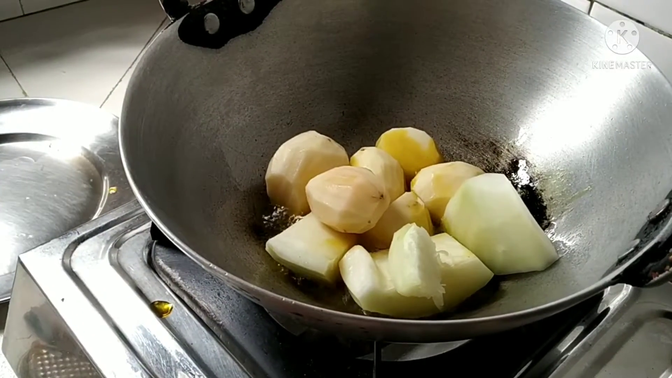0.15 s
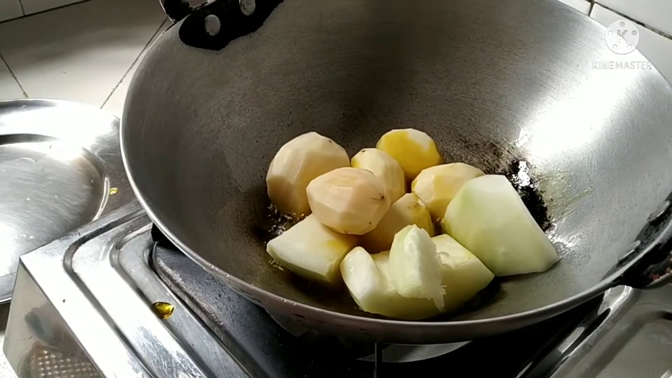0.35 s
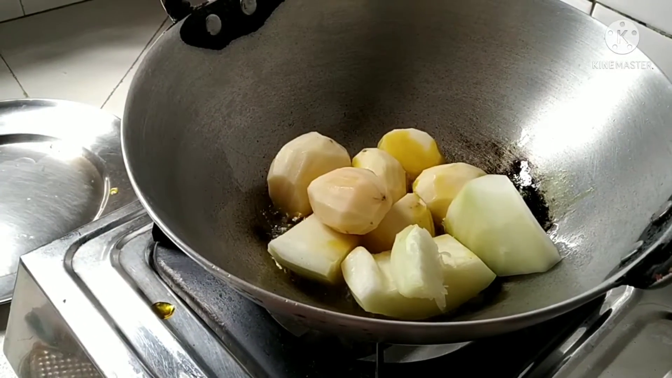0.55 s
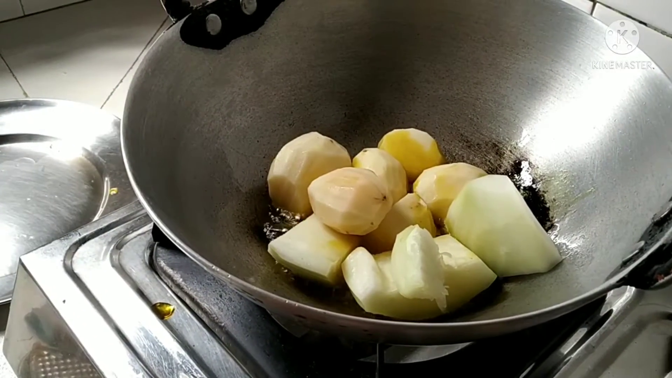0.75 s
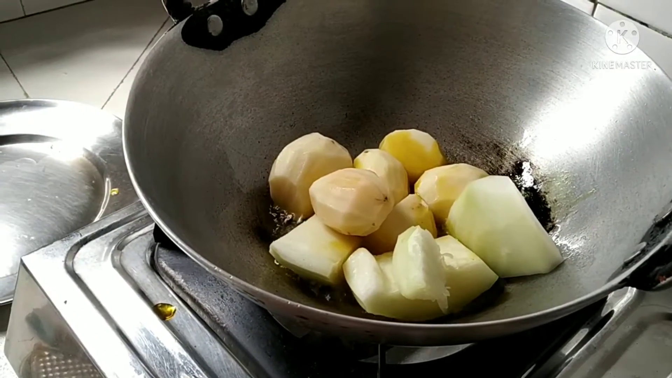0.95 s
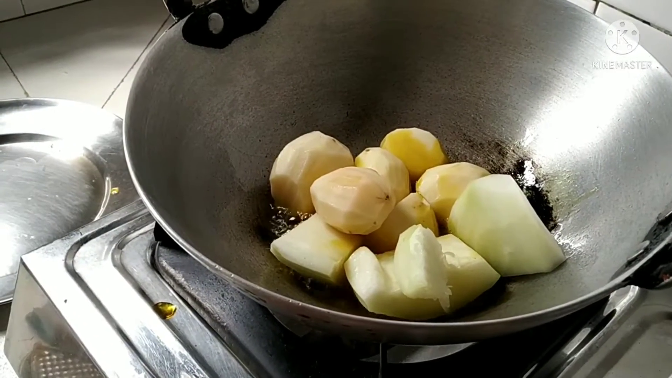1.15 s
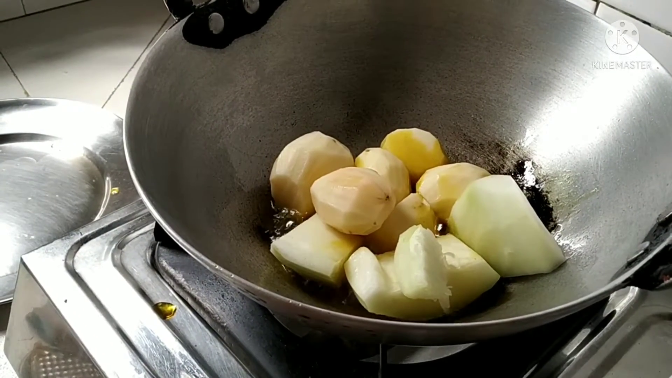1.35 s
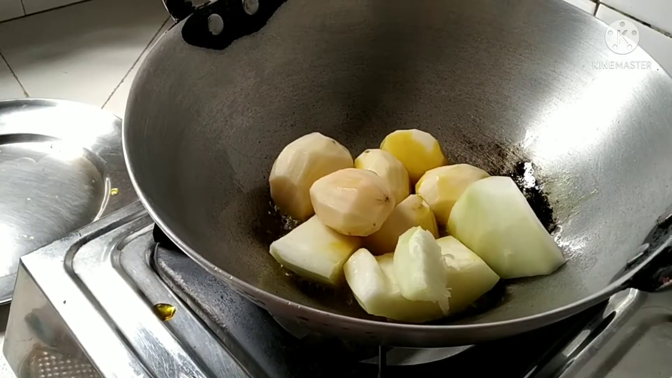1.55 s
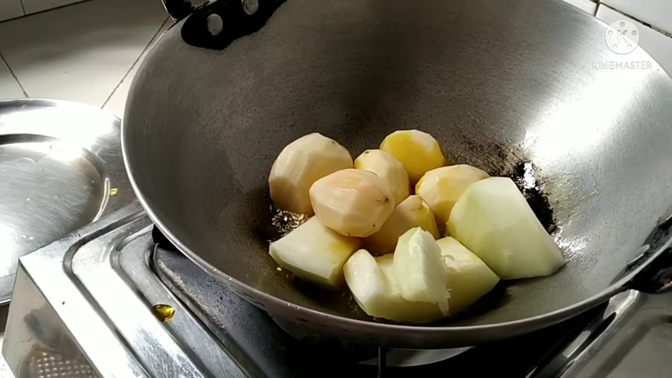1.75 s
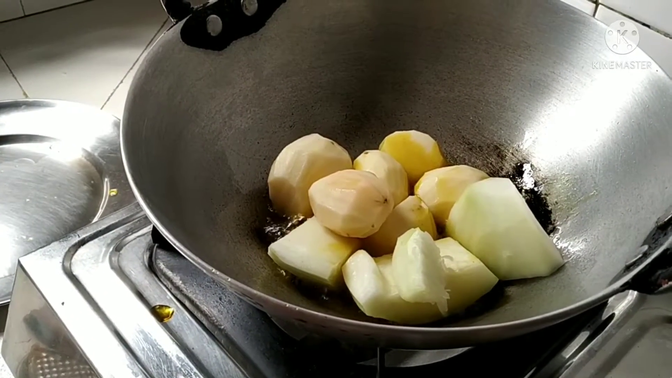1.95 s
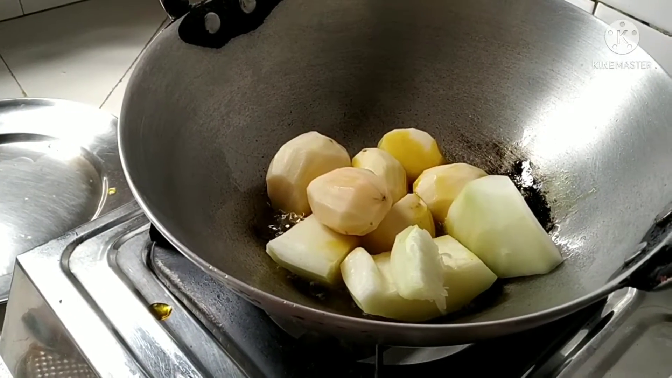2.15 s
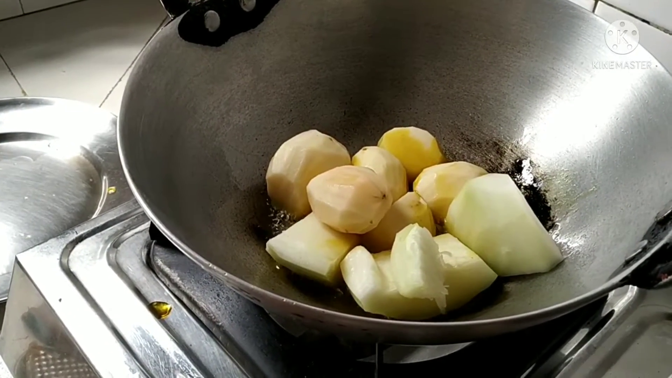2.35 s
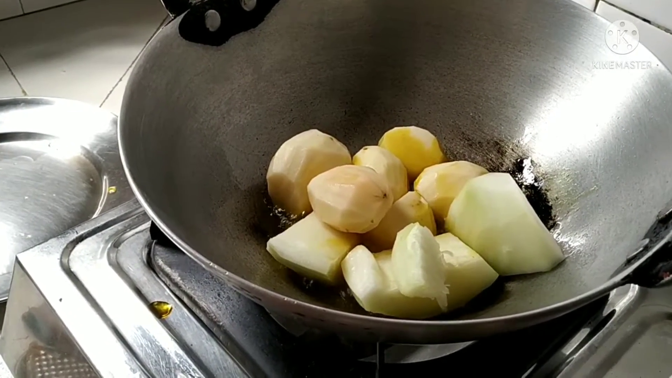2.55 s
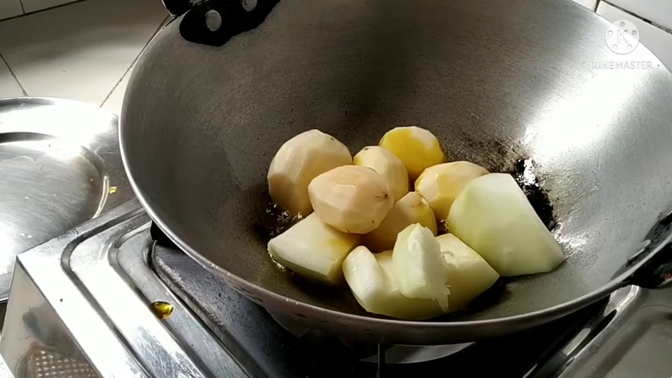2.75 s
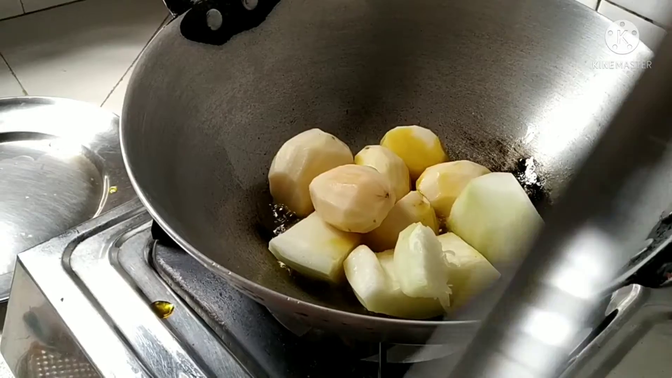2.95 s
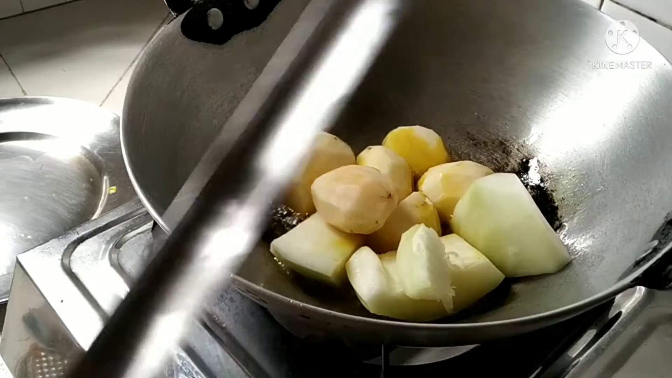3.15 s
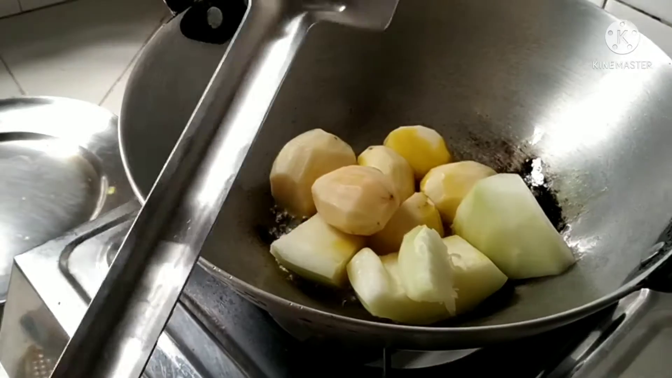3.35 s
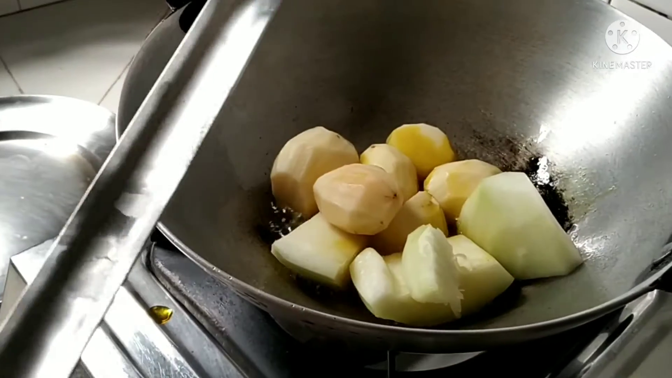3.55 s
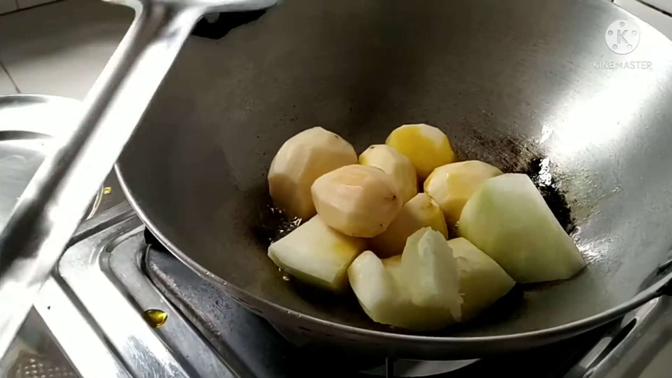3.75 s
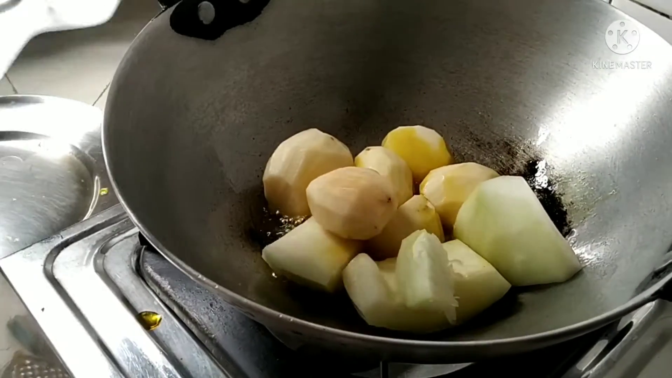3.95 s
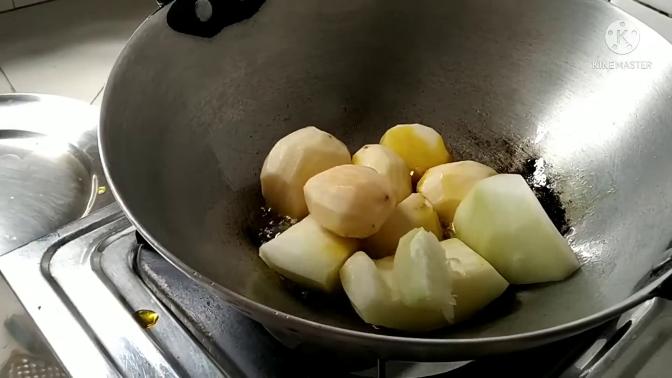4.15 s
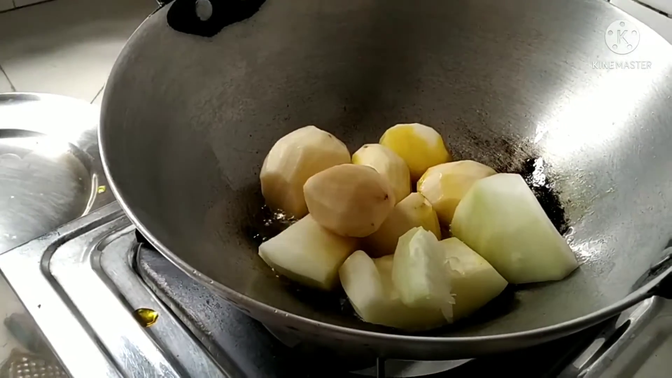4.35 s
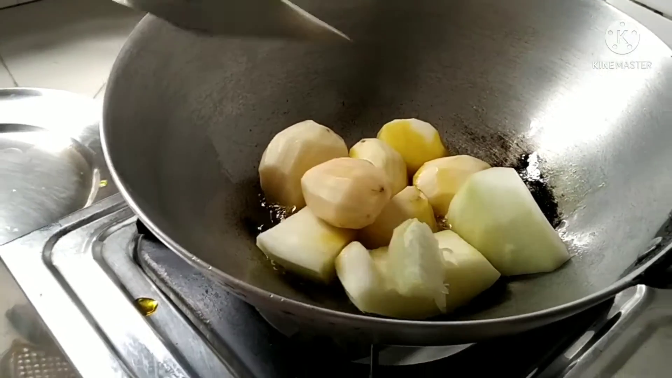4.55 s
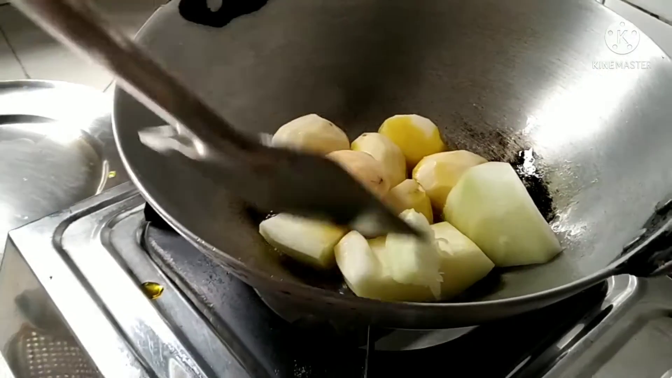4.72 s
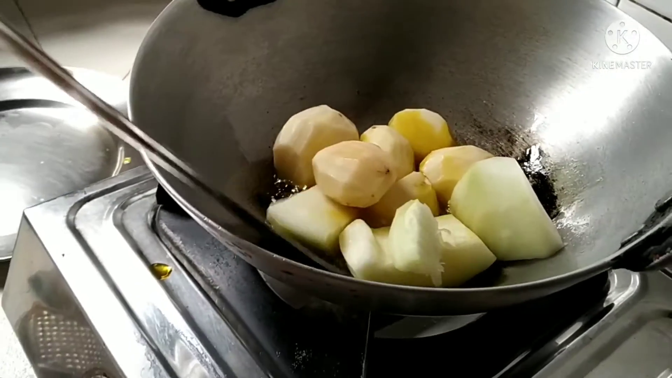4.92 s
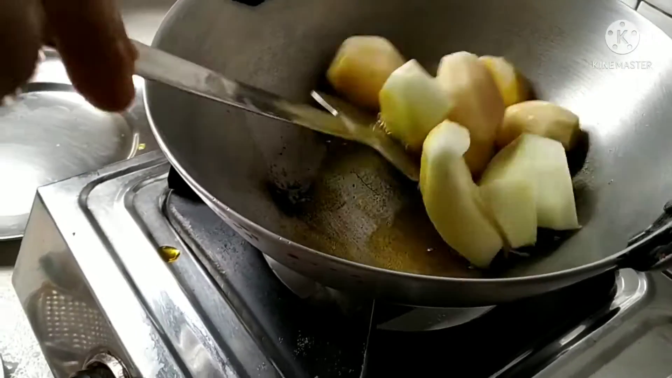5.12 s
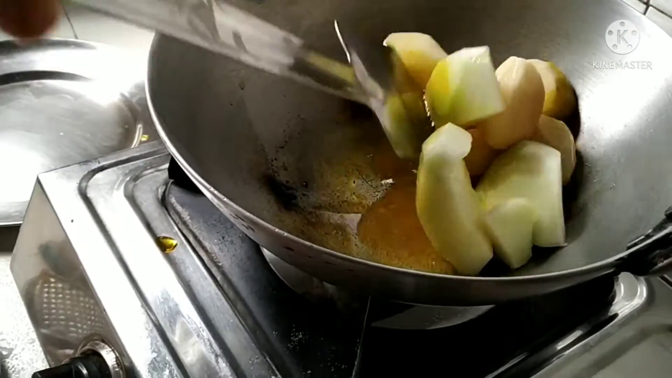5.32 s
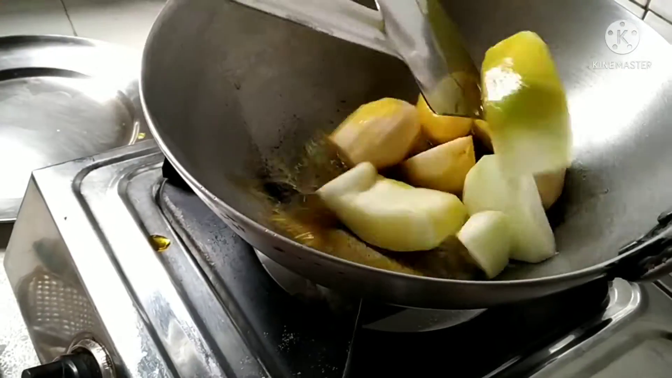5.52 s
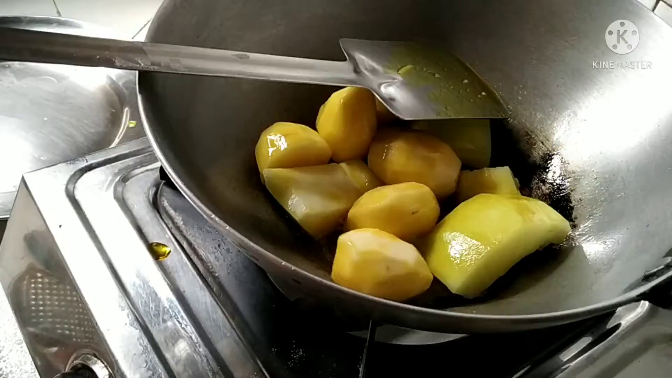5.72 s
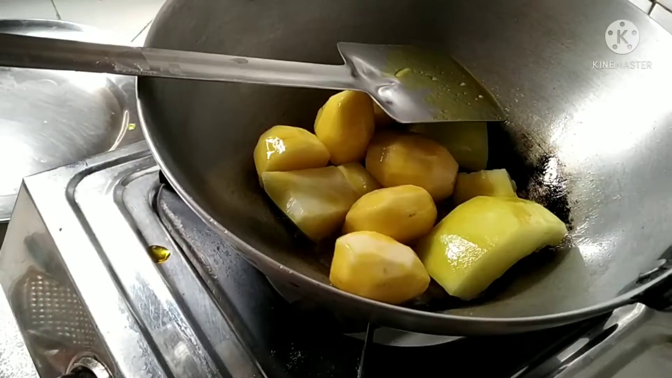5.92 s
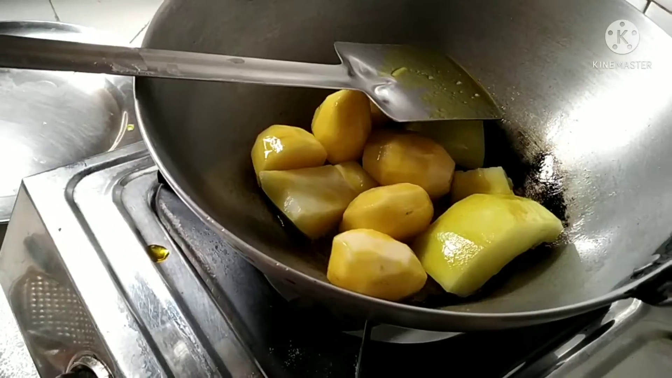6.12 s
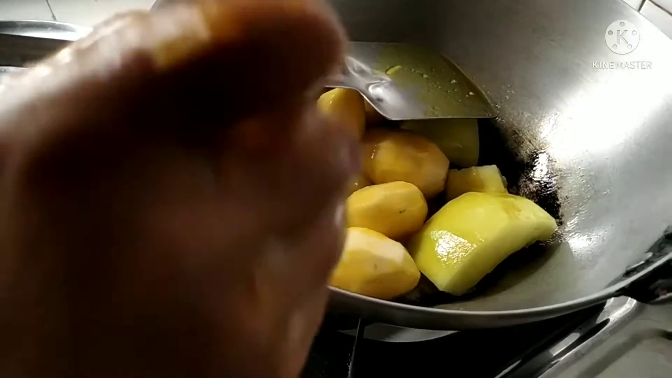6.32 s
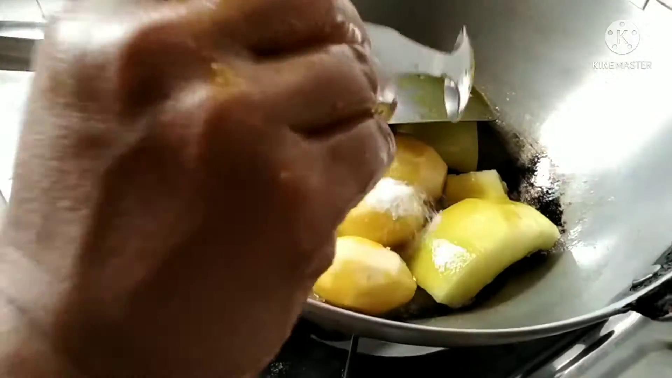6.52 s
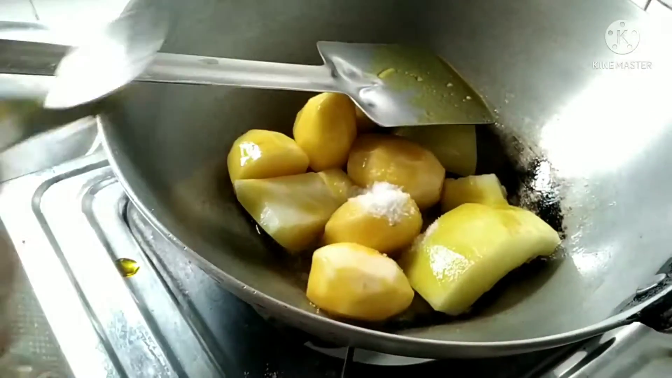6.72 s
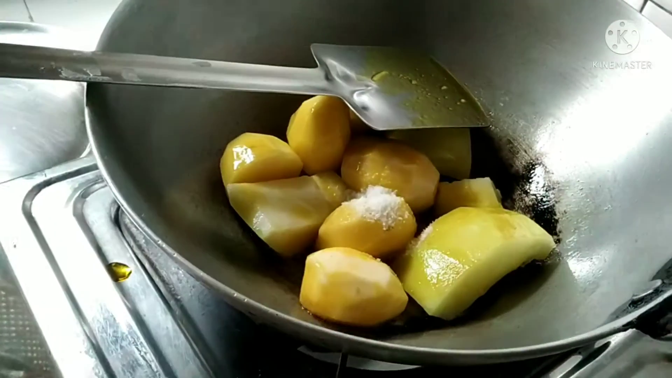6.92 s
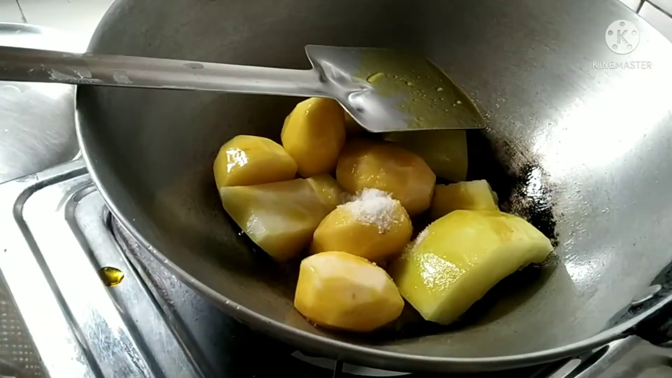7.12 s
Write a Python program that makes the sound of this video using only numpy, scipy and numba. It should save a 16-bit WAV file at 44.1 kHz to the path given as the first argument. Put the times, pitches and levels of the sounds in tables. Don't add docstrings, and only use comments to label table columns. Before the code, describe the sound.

Vegetables sizzle in oil in a metal pan, crackling finely. Light steel clinks come early, then a loud flat slap, rocking rattle and bright ringing clang; later a scrape-like run of knocks as the pieces are turned and the frying flares. The sound cuts out briefly and returns as even frying with small ticks. Stereo phone pickup, small hard-walled kitchen.

```python
import sys
import numpy as np
from scipy import signal
from scipy.fft import rfft, irfft, next_fast_len
from scipy.io import wavfile
from scipy.ndimage import uniform_filter1d, minimum_filter1d
from numba import njit

SR = 44100
rng = np.random.default_rng(int(sys.argv[2]) if len(sys.argv) > 2 else 0)


def dump_mix(stems):
    frames = np.atleast_2d(stems).T
    limited = np.clip(frames, -1, 1)
    pcm = np.round(limited * 32767).astype(np.int16)
    wavfile.write(sys.argv[1], SR, pcm)


def voltage_ratio(level):
    return 10 ** (np.asarray(level, float) / 20)


N = 321048
TIME, SIZE = np.arange(N) / SR, next_fast_len(N)
HZ = np.maximum(np.arange(SIZE // 2 + 1) * SR / SIZE, 1)
SECOND_SHOT_S = 5.8


def unit(x):
    return x / np.sqrt(np.mean(x ** 2))


def response(points):
    hz, db = np.transpose(points)
    return voltage_ratio(np.interp(np.log(HZ), np.log(hz), db))


def colour(x, points):
    return unit(irfft(rfft(x, SIZE) * response(points), SIZE)[:, :N])


def band(x, hz, width_hz):
    return signal.lfilter(*signal.iirpeak(hz, hz / width_hz, SR), x)


def walk(rate):
    k = int(SR / rate)
    held = np.repeat(rng.standard_normal(N // k + 1), k)
    return 1.53 * uniform_filter1d(uniform_filter1d(held, k), k)[:N]


def by_shot(first, second):
    return np.where(TIME < SECOND_SHOT_S, first, second)


def curve(shots):
    return by_shot(*(np.interp(TIME, *np.transpose(shot)) for shot in shots))


def bursts(rows, rise_s):
    out, t = np.zeros((2, N + SR)), TIME[:SR // 4]
    for s, db, hz, width_hz, t60 in rows:
        i = int(s * SR)
        noise = rng.standard_normal((2, len(t)))
        shake = unit(band(band(noise, hz, 1.41 * width_hz), hz, 1.41 * width_hz))
        decay = voltage_ratio(db - 5.5 - 60 * t / t60)
        out[:, i:i + len(t)] += decay * np.minimum(t / rise_s, 1) * shake
    return out[:, :N]


# hz, width_hz, level_db
ROOM_MODES = [(40, 5, -14.5), (68.1, 4.7, -3.5), (99.3, 6.1, -4.5), (138.6, 5.9, -9.5), (204, 5.1, -11),
              (90, 120, -10)]
# time_s, level_db
FLAME = [
    [(0, -47.5), (2.5, -47.5), (3.1, -50), (4.2, -48), (4.6, -46.5), (5.6, -45)],
    [(5.9, -53), (6.3, -47.5), (7.28, -48)],
]


def flame():
    roar = rng.standard_normal((2, N))
    rumble = unit(sum(voltage_ratio(db) / np.sqrt(width) * band(roar, hz, width) for hz, width, db in ROOM_MODES))
    low_cut = signal.butter(N=4, Wn=35, btype="high", fs=SR, output="sos")
    return signal.sosfilt(low_cut, rumble) * voltage_ratio(curve(FLAME) + 3.5)


def kitchen(x):
    t60_s, echo_db = 0.35, -7.5
    t = TIME[:SR // 2]
    echo = rng.standard_normal((2, len(t))) * voltage_ratio(-60 * t / t60_s) * (t > .004)
    echo /= np.sqrt(np.sum(echo ** 2, axis=1, keepdims=True))
    return x + voltage_ratio(echo_db) * signal.fftconvolve(x, echo, axes=1)[:, :N]


# start_s, peak_db, centre_hz
THUDS = [(.406, -28, 460), (.73, -31, 484), (.804, -32, 277), (.899, -31.5, 466), (.945, -23.5, 320),
         (2.456, -15, 1790), (2.458, -23, 330), (2.705, -24.5, 600), (2.707, -24.5, 285), (2.721, -31, 100),
         (2.735, -22, 899), (2.933, -25, 1190), (2.96, -31, 921), (4.958, -18, 1100), (4.96, -27, 300),
         (4.99, -24, 500), (5.05, -30.5, 484), (5.151, -38, 339), (5.21, -28, 900), (5.33, -32.5, 256)]
# start_s, peak_db, centre_hz
SLAPS = [
    (2.456, -1.5, 863),
    (5.497, -23, 1500),
]
# start_s, peak_db
ROCKS = [(2.488, -23), (2.515, -22), (2.543, -25), (2.571, -21), (2.586, -23)]
# start_s, peak_db, centre_hz
CATCHES = [(5.095, -23, 2190), (5.135, -27, 2010), (5.19, -23.5, 476), (5.2, -21, 2260), (5.335, -25, 1010),
           (5.678, -25.5, 1034), (7.248, -26.5, 910)]


def knocks():
    rows = [(s, db, hz, 0.85 * hz, 0.21) for s, db, hz in THUDS]
    rows += [(s, db, hz, 0.85 * hz, 0.035) for s, db, hz in SLAPS]
    rows += [(s, db, 388, 160, 0.16) for s, db in ROCKS]
    rows += [(s, db, hz, 0.2 * hz, 0.092) for s, db, hz in CATCHES]
    return bursts(rows, 0.0035)


# start_s, blade_db, blade_hz, wall_db, t60_s
CLINKS = [(.385, -22, 8000, -41, 0.25), (.408, -9, 8750, -25, 0.12), (0.897, -10, 8900, -27, 0.049),
          (.915, -15.5, 10500, -27.5, 0.272), (.947, -19, 9000, -23.5, 0.12),
          (2.455, -14, 6600, -16, 0.066), (2.703, -4.5, 7500, -13, 0.12), (2.729, -6, 6500, -15.5, 0.19),
          (2.931, -14, 8700, -15.5, 0.094), (2.948, -16.5, 8500, -21, 0.17), (2.965, -22, 8000, -20, 0.17),
          (4.953, -9, 8630, -14.5, 0.18), (4.955, -3.5, 8500, -19, 0.2), (4.969, -7.5, 7560, -24, 0.29),
          (5.051, -15, 8450, -25.5, 0.23), (5.497, -9, 7100, -13.5, 0.014), (5.507, -12, 9000, -31, 0.14),
          (5.527, -16, 8500, -33, 0.22)]


def clinks():
    blade = [(s, db, hz, 4500, t60) for s, db, hz, _, t60 in CLINKS]
    wall = [(s, db, 2800, 2000, t60) for s, _, _, db, t60 in CLINKS]
    return bursts(blade + wall, 0.00099)


# start_s, peak_db, pitch_hz, t60_s
TINKS = [(.408, -20, 5470, .17), (.41, -14, 9860, 0.16), (.898, -17, 7470, 0.073), (.899, -20, 11300, .15),
         (.918, -23, 10570, .35), (.92, -25, 11750, .25), (0.944, -31, 2820, 0.12),
         (2.456, -9.5, 2560, 0.065), (2.52, -26, 1030, 0.26), (4.954, -20, 7120, .25),
         (4.954, -9.5, 8930, 0.23), (4.956, -19.5, 2300, .24), (4.956, -14.5, 2870, .21),
         (5.4975, -13, 6500, .018)]


def tinks():
    return bursts([(s, db, hz, 23 / t60, t60) for s, db, hz, t60 in TINKS], .002)


# start_s, peak_db,
# pitch_hz
TICKS = [(.409, -16, 8500), (.898, -14, 8500), (2.9318, -10, 8000), (2.934, -17, 2800), (2.9465, -16, 8300),
         (5.4978, -9, 6550), (5.5085, -11, 9000), (6.753, -16, 8500), (6.939, -17, 8000)]


def ticks():
    t60_s = 0.011
    out, t = np.zeros((2, N)), TIME[:SR // 50]
    port_turn = np.array([[0], [.25]])
    for s, db, hz in TICKS:
        i = int(s * SR)
        out[:, i:i + len(t)] += voltage_ratio(db - 60 * t / t60_s) * np.sin(2 * np.pi * (hz * t + port_turn))
    return out


SPATULA_HZ = [345, 388, 568, 619, 894, 2256, 2750, 3058, 4151, 5098, 5582, 6282, 7795, 8975, 9561]
# level_db, t60_s
SPATULA = [(-33, 0.85), (-39.5, 0.85), (-29.5, 0.35), (-36.5, 0.81), (-31, 0.28), (-32, 0.33),
           (-18.5, 0.12), (-19, 0.13), (-29, 0.33), (-22, 0.22), (-24, 0.22), (-38, 0.22), (-29, .25),
           (-22, 0.17), (-20, 0.27)]
# start_s, level_db
RINGS = [
    (2.703, 4.5),
    (2.728, -8.5),
    (2.931, -19),
]
# start_s, pitch_hz, level_db, t60_s, stop_s
LONG_RING = [
    (2.705, 1298, -39.5, 6.5, 4.15),
    (2.703, 4485, -31.5, 30, 3.07),
    (2.703, 7104, -20, .8, 2.96),
    (2.92, 3155, -37, 2.2, 3.4),
]


def spatula():
    out, t = np.zeros((2, N)), TIME[:SR]
    hz, (mode_db, t60) = np.array(SPATULA_HZ)[:, None], np.transpose(SPATULA)[:, :, None]
    for s, db in RINGS:
        i, turn = int(s * SR), rng.random((2, len(SPATULA), 1))
        modes = voltage_ratio(db + mode_db - 60 * t / t60) * np.sin(2 * np.pi * (hz * t + turn))
        out[:, i:i + SR] += modes.sum(axis=1)
    for s, tone_hz, db, tone_t60, stop in LONG_RING:
        held = np.clip((TIME - s) / .008, 0, 1) * np.clip((stop - TIME) / .06, 0, 1)
        phase = 2 * np.pi * tone_hz * TIME
        out += held * voltage_ratio(db - 60 * (TIME - s) / tone_t60) * np.array([np.sin(phase), np.cos(phase) / 2])
    return out


# start_s, peak_db, centre_hz
SPITS = [(1.817, -21, 4350), (1.8567, -16, 5600), (2.532, -13.5, 4470), (2.684, -30, 2750),
         (3.009, -22, 4400), (3.3324, -22, 3260), (3.4794, -29.5, 6230), (3.689, -20, 4420),
         (4.122, -18.5, 6080), (4.8644, -17.5, 7000), (6.0096, -15.5, 3280), (6.7344, -22, 7000),
         (6.9386, -20, 2650), (7.0666, -21.5, 2540), (7.1292, -21.5, 2630), (7.2494, -15, 4200)]
# start_s, peak_db
FLARES = [(0.05, -17), (.329, -19), (0.548, -14), (.729, -20), (1.309, -25), (1.399, -23), (1.509, -22),
          (2.049, -23), (3.221, -19), (3.848, -28), (4.299, -25), (4.593, -21), (5.119, -20), (5.349, -11),
          (5.579, -17), (5.629, -15), (5.959, -20), (6.159, -15), (6.229, -19), (6.419, -22), (6.753, -20),
          (6.849, -17.5), (6.938, -17), (6.999, -22), (7.249, -16)]


def spits():
    pops = [(s, db, hz, 900, .06) for s, db, hz in SPITS]
    flares = [(s, db, 8500, 4000, .1) for s, db in FLARES]
    return bursts(pops, 0.0022) + voltage_ratio(-0.5) * bursts(flares, .004)


# peak_s, length_s, bubbling_db, murmur_db
JOSTLES = [
    (2.592, 0.14, 6, 9.5),
    (5.174, .14, 6, 8.5),
    (6.11, .15, 0.5, 1),
    (6.97, 0.26, 1.5, -0.5),
]


def jostle():
    swell = 0
    for s, length, *db in JOSTLES:
        swell = swell + np.outer(db, np.clip(1 - np.abs(TIME - s) / length, 0, 1))
    return swell


# hz, level_db
MURMUR = [(30, -53.5), (100, -5), (200, -2), (350, -1.5), (600, -4), (900, -4), (1300, -6.5), (2000, -7.5),
          (4000, -24)]


def murmur(swell_db):
    noise = colour(rng.standard_normal((2, N)), MURMUR)
    return noise * voltage_ratio(by_shot(-47, -47.5) + swell_db + 2.0 + 2.0 * walk(12))


@njit
def add_grains(out, start, hz, turns, size, glide):
    for k in range(len(start)):
        z, p = size[k] + 0j, np.exp(2 * np.pi * hz[k] / SR * (1j - 1 / turns))
        bend = np.exp(1j * glide * (2 * np.pi * hz[k] / SR) ** 2)
        for i in range(start[k], min(len(out), start[k] + int(turns * SR / hz[k]))):
            z *= p
            p *= bend
            out[i] += z.imag


def bubbles(count, lo_hz, hi_hz, turns, scatter_db):
    out = np.zeros((2, N))
    for row in out:
        when, pitch, big = rng.random((count, 3)).T
        hz = lo_hz + (hi_hz - lo_hz) * pitch
        size = voltage_ratio(-scatter_db * np.log(1 - big)) * np.sqrt(hz)
        add_grains(row, (when * N).astype(np.int64), hz, turns, size, 0.0035)
    return out


# hz, level_db
COARSE = [(700, -28), (1500, -13), (2000, -8.5), (2700, -2), (3300, -1.5), (3800, -3.5), (4500, -3),
          (6000, -10), (9000, -35)]


def bubbling(boil_db, swell_db, seethe):
    since_s = TIME - by_shot(0, SECOND_SHOT_S)
    drying_db = by_shot(-.5, -1.5) * since_s
    level_db = boil_db + by_shot(-10, -6.5) + drying_db + swell_db
    coarse = colour(bubbles(count=30000, lo_hz=700, hi_hz=7000, turns=14., scatter_db=1.6), COARSE)
    return coarse * voltage_ratio(level_db + 5.5 + 1.1 * seethe + 0.43 * walk(40))


# hz, level_db
FINE = [(2500, -29.5), (4000, -9.5), (5000, -8), (6000, -7), (7000, -3.5), (9000, -1.5), (10500, -4.5),
        (12000, -5.5), (13500, -11.5), (15000, -8.5), (16000, -32.5)]


def fizz(boil_db, seethe):
    fine = colour(bubbles(count=90000, lo_hz=2500, hi_hz=17000, turns=16., scatter_db=1.3), FINE)
    return fine * voltage_ratio(boil_db + 6.0 + .45 * seethe + .5 * walk(70))


# time_s, fizz_db
BOIL = [
    [(0.0, -30.5), (0.12, -32.5), (1.67, -33), (2.66, -34), (3.45, -34.5), (3.85, -33), (4.37, -34),
     (5.01, -34.5), (5.13, -28.5), (5.21, -26), (5.35, -27.5), (5.55, -28.5)],
    [(6.07, -32.5), (6.682, -32.5), (6.966, -31.5), (7.28, -32)],
]


def frying():
    boil_db = curve(BOIL)
    bubbling_swell_db, murmur_swell_db = jostle()
    seethe = walk(16)
    return fizz(boil_db, seethe) + bubbling(boil_db, bubbling_swell_db, seethe) + murmur(murmur_swell_db)


def scene():
    contacts = knocks() + clinks() + tinks() + ticks()
    return flame() + kitchen(contacts + spits()) + spatula() + frying()


# hz, share (of the level of the lines around)
STARVED = [(1200, 0.05), (2200, .6), (3000, .85), (3500, 1.25), (5200, 1.2), (5900, .9), (10000, .95),
           (12500, 1.25), (15000, 1.1)]


def phone_thinning(x, size=2048):
    hz, _, z = signal.stft(x, SR, "cosine", size)
    power = np.abs(z) ** 2
    local = 4 / np.pi * uniform_filter1d(np.abs(z), size=64, axis=1) ** 2
    mood = uniform_filter1d(rng.standard_normal((len(hz) // 8 + 1, z.shape[2])), size=4)
    mood_db = 5.5 * mood.repeat(8, axis=0)[:len(hz)]
    at, share = np.transpose(STARVED)
    weak = power < local * (np.interp(hz, at, share)[:, None] * voltage_ratio(mood_db)) ** 2
    energy = np.pad((x ** 2).sum(axis=0), (0, size)) + 1e-12
    around = uniform_filter1d(energy, size=size, origin=size // 2 - 1)
    jump = uniform_filter1d(energy, size=128) / around
    calm = minimum_filter1d(-jump, size=size)[::size // 2][:z.shape[2]] > -4.0
    kept = z * ~(weak & calm) * (hz < 15650)[:, None]
    return signal.istft(kept, SR, "cosine", size)[1][:, :N]


def band_limit(x):
    return signal.sosfilt(signal.butter(12, 16530, fs=SR, output="sos"), x)


# hz, level_db
LEFT_EXTRA = [(60, 1), (900, 1.5), (2600, -2.5), (4500, 0.9), (6000, 8.5), (7200, 1), (10300, 4.5),
              (12000, -1), (13500, 6.5), (14800, 0.5)]
# time_s, level_db
SCENE_CHANGE = [(5.7115, 0), (5.7125, -26), (5.722, -36), (5.729, -70), (5.858, -70), (5.866, -21),
                (5.878, -7), (5.9, -3), (5.96, 0)]


def record(dry):
    port_null_hz = 1287
    alike = .96 * np.sinc(HZ / port_null_hz)
    mid, side = rfft(dry, SIZE) * np.sqrt([(1 + alike) / 2, (1 - alike) / 2])
    lean = np.sqrt(response(LEFT_EXTRA))
    ports = irfft([(mid + side) * lean, (mid - side) / lean], SIZE)[:, :N]
    s, db = np.transpose(SCENE_CHANGE)
    gate_db = np.interp(TIME, s, db)
    gate = voltage_ratio(gate_db) * (gate_db > min(db))
    mix = phone_thinning(np.tanh(ports)) * gate
    return band_limit(mix)


dry = scene()
out = record(dry)
dump_mix(out)
```